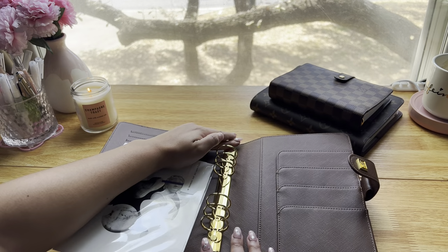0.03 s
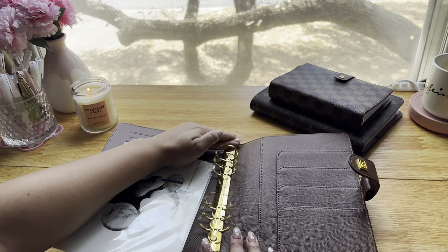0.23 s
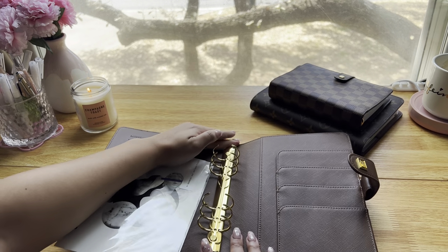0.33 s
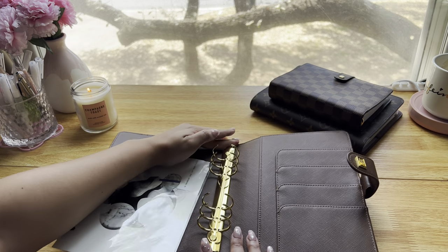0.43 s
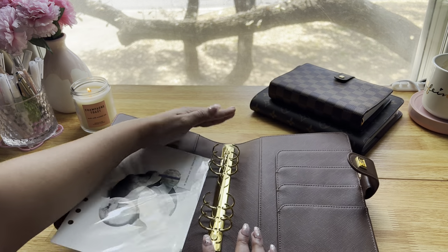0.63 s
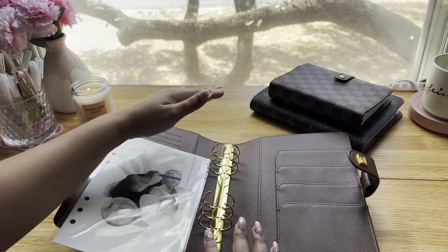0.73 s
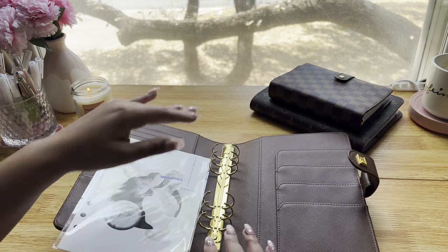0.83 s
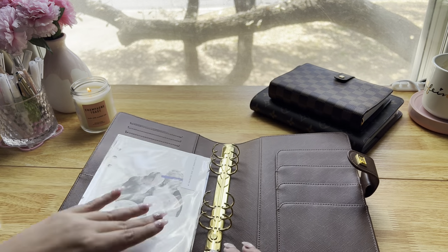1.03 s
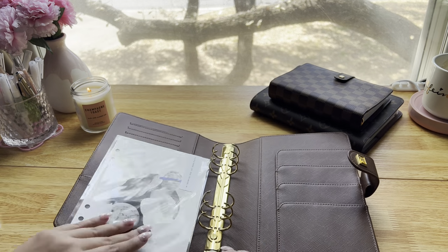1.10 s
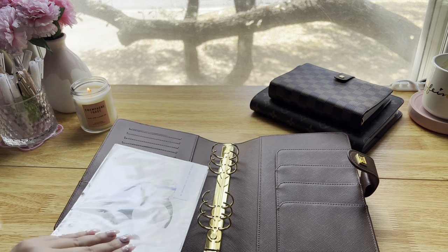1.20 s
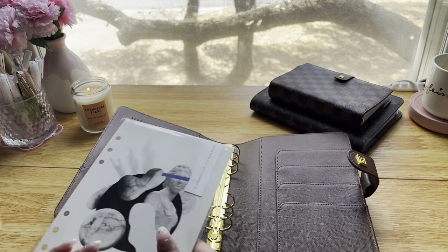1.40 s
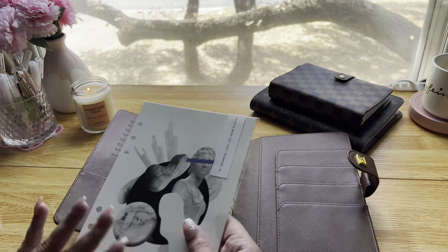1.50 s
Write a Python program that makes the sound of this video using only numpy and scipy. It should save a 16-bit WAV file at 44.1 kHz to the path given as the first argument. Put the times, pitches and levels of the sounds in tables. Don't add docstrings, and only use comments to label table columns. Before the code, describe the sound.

A metal ring binder snaps shut hard with a quick rattle, then plastic sheet ticks and rustles

```python
import sys
import numpy as np
from scipy import signal
from scipy.fft import rfft, irfft
from scipy.io import wavfile
from scipy.ndimage import uniform_filter1d

SR = 44100
rng = np.random.default_rng(int(sys.argv[2]) if len(sys.argv) > 2 else 0)


def to_linear_factor(level_db):
    exponent = np.asarray(level_db, float) / 20
    return 10 ** exponent


def wav_record(signal):
    frames = np.transpose(np.atleast_2d(signal))
    bounded = np.clip(frames, -1, 1)
    quanta = np.round(bounded * 32767).astype(np.int16)
    wavfile.write(sys.argv[1], SR, quanta)


N = 68355


def read(points, hz):
    f, value = np.transpose(points)
    return np.interp(np.log(hz + 1), np.log(f + 1), value)


def evened(x):
    return x / np.sqrt(np.mean(x ** 2) + 1e-20)


def high(x, hz):
    return signal.sosfilt(signal.butter(3, hz, "high", fs=SR, output="sos"), x)


def add(mix, s, sound, pan_db):
    part = mix[:, round(s * SR):][:, :sound.shape[-1]]
    panned = sound * to_linear_factor(np.array([[.5], [-.5]]) * pan_db)
    part += panned[:, :part.shape[1]]


# pitch_hz, likeness (0-1)
CAPSULE_LIKENESS = [(50, 0.63), (300, 1), (1000, 0.41), (5000, 0.047)]


def hiss(tone, size, patchy_db, likeness):
    frames, hz = size // 128 + 5, np.fft.rfftfreq(512, 1 / SR)
    a, b, c, d, patches = rng.standard_normal((frames, 257, 5)).T
    patches = uniform_filter1d(patches, size=6, axis=0)
    patches = evened(uniform_filter1d(patches, size=16, axis=1))
    same = np.clip(likeness * read(CAPSULE_LIKENESS, hz), -1, 1)[:, None]
    left, other = a + 1j * b, c + 1j * d
    z = np.array([left, same * left + np.sqrt(1 - same ** 2) * other])
    gain = to_linear_factor(read(tone, hz)[:, None] + patchy_db * patches)
    noise = signal.istft(z * gain, nperseg=512, noverlap=384)[1]
    return evened(noise[:, :size])


def ring(modes, size, spread):
    t = np.arange(size) / SR
    lead = rng.uniform(-1, 1, (len(modes), 2))
    out = 0
    for (hz, db, t60), lag in zip(modes, lead):
        phase = 2 * np.pi * hz * t + spread * lag[:, None] * np.minimum(t * hz, 1)
        out = out + to_linear_factor(db - 60 * t / t60) * np.sin(phase)
    return out


# pitch_hz, level_db
LEAD_IN_TONES = [(1400, -39.5), (2700, -45), (4800, -41.5), (6500, -39), (7800, -51)]


def lead_in():
    lead_in_s = .02
    t = np.arange(0, lead_in_s, 1 / SR)
    waver = uniform_filter1d(rng.standard_normal((len(LEAD_IN_TONES), len(t))), size=60, axis=1)
    waver = 1 + 0.52 * evened(waver)
    tones = sum(to_linear_factor(db) * w * np.sin(2 * np.pi * hz * t) for (hz, db), w in zip(LEAD_IN_TONES, waver))
    out = np.zeros((2, N))
    add(out, SLAMS[0][0] - lead_in_s, tones * (t / lead_in_s) ** .9, SNAP_PAN_DB)
    return out


# pitch_hz, lead_radians
CAPSULE_LEAD = [(150, 0), (600, .7), (1800, .9), (5000, 1.5), (15000, 1.3)]


def lead_left(x):
    turn = np.exp(.5j * read(CAPSULE_LEAD, np.fft.rfftfreq(N, 1 / SR)))
    return irfft(rfft(x) * [turn, 1 / turn], N)


SNAP_PAN_DB, TICK_PAN_DB = 2.5, 5.5
# start_s, level_db, brightness_db, knock_hz, knock_db
SLAMS = [
    (.2470, -9, 4, 922, -3.5),
    (0.2509, -11.5, 2.5, 844, 6.5),
    (0.2566, -10, -4.5, 678, 2.5),
    (.2610, -20.5, 0.5, 830, 4),
    (.2680, -12.5, -6.5, 419, 2.5),
    (0.2741, -15.5, -3, 450, 5.5),
    (.2810, -17.5, -4.5, 422.4, 6.5),
    (.2880, -21, -1.5, 440, 3.5),
    (0.3034, -24, -8.5, 401, 6),
]
# pitch_hz, level_db, t60_s
WOOD_MODES = [(187, -16, 0.12), (242.4, -8.5, 0.2), (265.5, -10, 0.27), (292.7, -10.5, 0.21),
              (502.7, -7.5, .15), (557, -17.5, 0.066), (664, -16, .08), (739.4, -12, .2), (795, -9, 0.11),
              (860, 3, .035), (1047.6, -14.5, 0.13), (1364, -19.5, .15), (1515, -21.5, .15),
              (1782, -20.5, 0.1), (2035, -20.5, 0.31)]
# pitch_hz, level_db, t60_s
STEEL_MODES = [(2360, -7.5, 0.092), (2500, 3, .025), (3185, -5.5, 0.12), (3380, -8.5, 0.14), (8210, -2, .1),
               (8300, -0.5, 0.027), (9210, -3.5, 0.089)]
# pitch_hz, level_db (per Hz)
CRACK_TONE = [(200, -45.5), (600, -19.5), (900, -12.5), (1500, -20.5), (2600, -18.5), (4500, -22.5),
              (8600, -22.5), (16000, -29.5)]


def snap():
    crack_db, crack_t60_s, crack_rise_s = -2.5, 0.022, .0009
    steel_db, wood_db, wood_push_s, knock_cycles = -21, -8.5, 0.00091, 21
    out, t = lead_in(), np.arange(int(.7 * SR)) / SR
    for s, db, bright_db, knock_hz, knock_db in SLAMS:
        crack = hiss(CRACK_TONE, len(t), 2.9, likeness=2.7)
        crack = crack * to_linear_factor(crack_db - 60 * t / crack_t60_s) * np.minimum(t / crack_rise_s, 1)
        steel = to_linear_factor(steel_db) * ring(STEEL_MODES, len(t), spread=0.31)
        wood = to_linear_factor(wood_db) * ring(WOOD_MODES, len(t), spread=1.0)
        knock = ring([(knock_hz, knock_db, knock_cycles / knock_hz)], len(t), spread=0.67)
        body = (wood + knock) * (1 - np.exp(-t / wood_push_s))
        add(out, s, to_linear_factor(db) * (to_linear_factor(bright_db) * (crack + steel) + body), SNAP_PAN_DB)
    return lead_left(out)


# pitch_hz, level_db, t60_s
SPINE_MODES = [(438, -31.5, .8), (444, -19.5, 0.13), (554.4, -47.5, 1), (748, -33.5, 0.49),
               (1358, -35.5, 0.29)]


def spine():
    out = np.zeros((2, N))
    add(out, SLAMS[0][0], ring(SPINE_MODES, SR, spread=0.14), SNAP_PAN_DB)
    return out


# pitch_hz, level_db, t60_s
LEVER_MODES = [(529, -63, .9), (1062, -65, .9), (1262, -67, .7), (1595, -77, .9)]


def lever():
    out = np.zeros((2, N))
    add(out, .104, ring(LEVER_MODES, round(.143 * SR), spread=.3), 1.5)
    return out


# start_s, level_db, ring_hz, fizz_top_hz, fizz_db
TICKS = [(0.107, -51, 875, 3150, -8), (.543, -34, 2256, 5960, -13.5), (.582, -47, 2600, 4900, -4),
         (.693, -36, 717, 2320, -12), (0.6976, -45, 416.4, 4480, -13), (.709, -44, 924, 5500, -11),
         (.716, -43, 980, 3400, -11), (0.74, -47.5, 2500, 4230, -1), (0.7426, -41, 1590, 2600, -10),
         (0.75, -48, 1870, 2830, 0), (.7965, -45.5, 2302, 4920, -4), (.799, -39.5, 1650, 3580, -7.5),
         (.808, -43.5, 1690, 2740, -9), (.969, -47, 1710, 3420, -13), (1.1633, -37.5, 3580, 6420, -5.5),
         (1.167, -41, 3000, 4200, -7), (1.178, -45, 4390, 6940, -3), (1.197, -52.5, 3440, 7500, -5.5),
         (1.212, -46.5, 3300, 4180, -7.5), (1.2177, -43.5, 5000, 9800, -1), (1.26, -44, 5610, 7020, -5.5),
         (1.2619, -45, 2326, 3030, -5), (1.2865, -40.5, 4000, 8120, -10), (1.286, -49, 1600, 2500, -0.5),
         (1.307, -48.5, 4230, 5000, -10), (1.31, -51.5, 1050, 2500, -2.5),
         (1.3567, -23.5, 2050, 2550, -15.5), (1.357, -35, 1430, 1825, -12),
         (1.3614, -39, 4700, 5300, -13.5), (1.3706, -40, 4300, 5000, -7), (1.4136, -35.5, 1780, 2220, -7),
         (1.428, -34.5, 7520, 12800, -6), (1.4365, -42.5, 615, 4460, -5), (1.4625, -41.5, 673, 900, -17),
         (1.4913, -33.5, 3280, 9010, -4), (1.4919, -38.5, 783, 1100, -22)]


def ticks():
    ring_cycles, fizz_t60_s, rise_s = 13, .011, .0006
    out, t = np.zeros((2, N)), np.arange(1500) / SR
    for s, db, hz, top_hz, fizz_db in TICKS:
        tone = ring([(hz, 0, ring_cycles / hz)], len(t), spread=1.0)
        fizz_tone = [(.5 * hz, -30), (.8 * hz, 0), (top_hz, -6), (1.4 * top_hz, -30)]
        fizz = hiss(fizz_tone, len(t), 1.4, likeness=2.5) * to_linear_factor(fizz_db - 60 * t / fizz_t60_s)
        add(out, s, to_linear_factor(db) * (tone + fizz) * (1 - np.exp(-t / rise_s)), TICK_PAN_DB)
    return out


# start_s, length_s, level_db, brightness_db (per octave)
PEELS = [
    (1.0815, 0.025, -44.5, -7.5),
    (1.351, .005, -47, 18),
    (1.3554, 0.0024, -32, 19),
    (1.36, .005, -38.5, 18.5),
]
# pitch_hz, width_hz, level_db
SHEET_MODES = [(1282, 580, -22), (2068, 490, -5), (3317, 770, 1.5), (4370, 670, -1), (6290, 1130, 8),
               (8380, 900, 8.5), (11200, 2000, -1.5)]


def peels():
    snaps_per_s, decay_lengths, rise_s = 9000, 3.5, .0008
    out, t = np.zeros((2, N)), np.arange(6000) / SR
    for s, length, db, bright_db in PEELS:
        snaps = (rng.random((2, len(t))) < snaps_per_s / SR) * rng.standard_normal((2, len(t)))
        snaps[1] = .7 * snaps[0] + 0.2 * snaps[1]
        modes = [(hz, level + bright_db * np.log2(hz / 2000), 2.2 / width)
                 for hz, width, level in SHEET_MODES]
        sheet = ring(modes, 400, spread=0)[:1]
        crackle = evened(signal.fftconvolve(snaps, sheet, axes=1)[:, :len(t)])
        fall_db = -5 * t / length - 60 * np.maximum(t - length, 0) / (decay_lengths * length)
        shape = np.minimum(t / rise_s, 1) * to_linear_factor(fall_db)
        add(out, s, to_linear_factor(db) * crackle * shape, TICK_PAN_DB)
    return out


# start_s, level_db
SLIDE_LEVEL = [(.55, -83), (.681, -72), (.712, -68.5), (.73, -72.5), (.755, -77), (.80, -75), (.89, -113),
               (1.07, -87), (1.097, -55), (1.2, -66), (1.309, -69.5), (1.335, -82), (1.375, -67.5),
               (1.55, -62)]
# pitch_hz, level_db (per Hz)
SLIDE_TONE = [(300, -27), (800, -1.5), (1500, -2), (2050, 0.5), (2700, -1), (8700, -6), (10500, -17),
              (16000, -18.5)]


def slide():
    s, db = np.transpose(SLIDE_LEVEL)
    flicker_db = 1.9 * evened(uniform_filter1d(rng.standard_normal(N), size=300))
    level_db = np.interp(np.arange(N) / SR, np.r_[.4, s], np.r_[-110, db])
    rustle = to_linear_factor(level_db + 1.5 + flicker_db) * hiss(SLIDE_TONE, N, 0.74, likeness=0.77)
    return rustle * to_linear_factor(np.array([[1.2], [-1.2]]))


# start_s, level_db
FLEX_LEVEL = [
    (1.40, -84),
    (1.43, -69),
    (1.47, -70),
    (1.5, -62.5),
    (1.55, -62.5),
]


def flex():
    s, db = np.transpose(FLEX_LEVEL)
    pitch_hz, width_hz = 2050, 600
    tone = [(pitch_hz - width_hz, -40), (pitch_hz, 0), (pitch_hz + width_hz, -40)]
    level_db = np.interp(np.arange(N) / SR, s, db, left=-120)
    return to_linear_factor(level_db) * hiss(tone, N, 1.0, likeness=2.8)


# start_s, level_db, pitch_hz, t60_s
BUMPS = [(.106, -43, 130, 0.1), (.696, -36.5, 266.7, 0.047), (.713, -42, 237, 0.071),
         (.745, -44.5, 203, 0.081), (0.801, -42.5, 130, 0.13), (0.865, -57, 110.9, 0.92),
         (1.44, -39.5, 130.8, 0.16), (1.452, -37.5, 149, 0.051), (1.4601, -33, 232, 0.042),
         (1.465, -33.5, 373, 0.031), (1.488, -37.5, 74, 0.07)]


def bumps():
    out, t = np.zeros((2, N)), np.arange(SR // 2) / SR
    for s, db, hz, t60 in BUMPS:
        modes = [(hz, db, t60), (.55 * hz, db - 5, t60), (1.9 * hz, db - 9, .6 * t60)]
        thud = ring(modes, len(t), spread=.2)
        add(out, s, thud * (1 - np.exp(-t / 0.0027)), .5)
    return out


# pitch_hz, t60_s
ROOM_DECAY = [(100, 0.52), (300, 0.42), (850, 0.42), (3000, 0.38), (8000, 0.36), (15000, 0.11)]
# pitch_hz, level_db
ROOM_TONE = [(100, -13), (300, -2.5), (600, -8), (860, -8.5), (1300, 2.5), (3000, -2), (9000, 0),
             (16000, -1)]


def room(x):
    taps = np.zeros((2, SR))
    at = np.arange(200, SR - 20, 20) + rng.integers(0, 20, (2, (SR - 201) // 20))
    np.put_along_axis(taps, at, rng.choice([-1., 1.], at.shape), 1)
    taps[1] = .5 * taps[0] + 0.88 * taps[1]
    hz, t, z = signal.stft(taps, SR, nperseg=512)
    gain_db = read(ROOM_TONE, hz)[:, None] - 60 * t / read(ROOM_DECAY, hz)[:, None]
    tail = signal.istft(z * to_linear_factor(gain_db), SR, nperseg=512)[1]
    tail[:, :200] = 0
    return signal.fftconvolve(x.mean(0)[None], tail / np.linalg.norm(tail[0]), axes=1)[:, :N]


# start_s, rumble_db, air_db
SWELL = [(0, -68, -6.5), (0.111, -55.5, 2.5), (.5, -55.5, 10), (0.751, -63.5, 9.5), (1.1, -57, 2.5),
         (1.3, -62.5, -2), (1.55, -57, 9.5)]
# pitch_hz, level_db (per Hz)
RUMBLE_TONE = [(20, -37.5), (35, -12.5), (55, -4.5), (80, -8.5), (112, 1.5), (150, -9), (220, -22.5)]
# pitch_hz, level_db (per Hz)
AIR_TONE = [(150, -32.5), (200, -8.5), (500, -5), (750, -20), (1900, -21.5), (2100, -20), (2400, -28.5),
            (16000, -45)]
# pitch_hz, level_db
HUM_TONES = [(390, -77.5), (2098, -90)]


def air():
    t = np.arange(N) / SR
    s, rumble_db, air_db = np.transpose(SWELL)
    hum = sum(to_linear_factor(db) * np.sin(2 * np.pi * hz * t) for hz, db in HUM_TONES)
    shared, left, right = rng.standard_normal((N, 3)).T
    hz = np.fft.rfftfreq(N, 1 / SR)
    rumble = rfft(shared + .25 * np.array([left, right])) * to_linear_factor(read(RUMBLE_TONE, hz)) * (hz < 300)
    rumble = evened(irfft(rumble, N))
    breath = to_linear_factor(-70) * hiss(AIR_TONE, N, 5.4, likeness=0.42)
    return to_linear_factor(np.interp(t, s, rumble_db)) * rumble + to_linear_factor(np.interp(t, s, air_db)) * (breath + hum)


def scene():
    loud = high(snap(), hz=130)
    small = ticks() + high(peels(), hz=1100)
    wet = room(to_linear_factor(-6.5) * loud + to_linear_factor(-12.5) * small)
    return loud + spine() + lever() + small + slide() + flex() + bumps() + wet + air()


# from_hz, to_hz, level_db
DEAD_BANDS = [(9650, 10350, -24), (13500, 14050, -26), (16000, 22050, -22), (16600, 22050, -40)]


def dull(x):
    hz = np.fft.rfftfreq(N, 1 / SR)
    gain_db = sum(db * (hz > lo) * (hz < hi) for lo, hi, db in DEAD_BANDS)
    return irfft(rfft(x) * to_linear_factor(uniform_filter1d(gain_db, size=200)), N)


# from_hz, to_hz, shut_share (of time, 0-1)
BLINK_BANDS = [(9600, 10500, .5), (10500, 11200, .3), (11200, 12000, .15), (12000, 12700, .3),
               (12700, 13400, .4), (13400, 14200, .9), (14200, 15200, .5), (15200, 16000, .35),
               (16000, 17000, .9)]


def blink(x):
    hz, t, z = signal.stft(x, SR, nperseg=1024)
    power = (abs(z[:, hz > 4000]) ** 2).sum((0, 1))
    steady = power < 3 * np.r_[power[:2], power[:-2]]
    luck = rng.random((len(t) // 4 + 1, len(BLINK_BANDS)))
    luck = np.repeat(luck, 4, axis=0)[:len(t)]
    gain = np.ones(z.shape[1:])
    for (lo, hi, shut), draw in zip(BLINK_BANDS, luck.T):
        gain[(hz >= lo) & (hz < hi)] = np.where(steady & (draw < shut), .01, 1)
    return signal.istft(z * gain, SR, nperseg=1024)[1][:, :N]


def low_pass(x):
    return signal.sosfilt(signal.butter(12, 16630, fs=SR, output="sos"), x)


def record(dry):
    overloaded = np.tanh(dry / 2) * 2.883
    mix = blink(dull(overloaded))
    return low_pass(mix)


dry = scene()
out = record(dry)
wav_record(out)
```